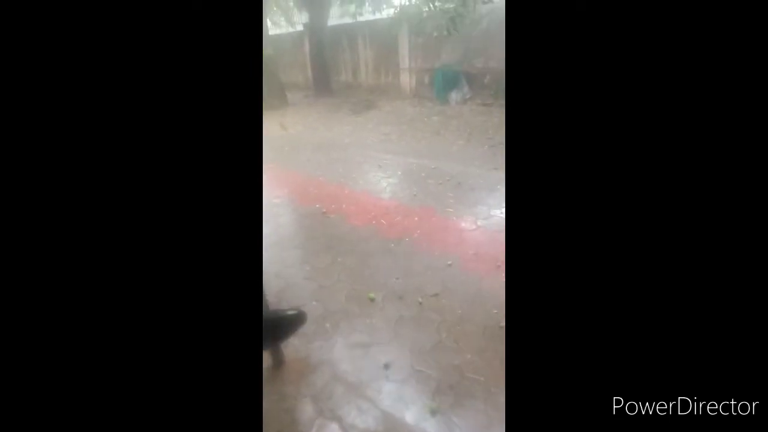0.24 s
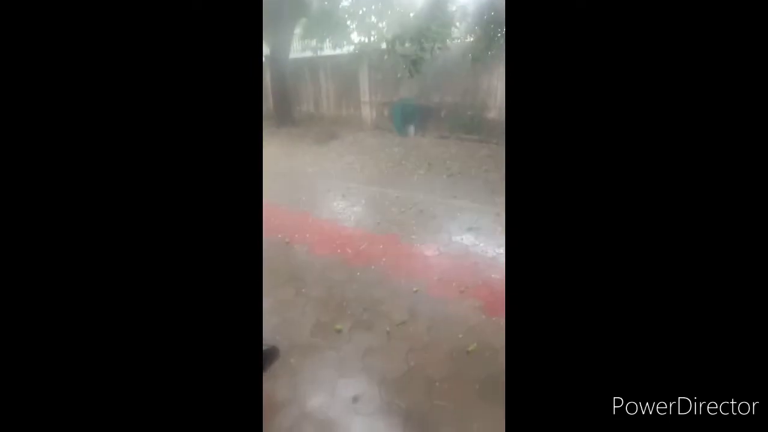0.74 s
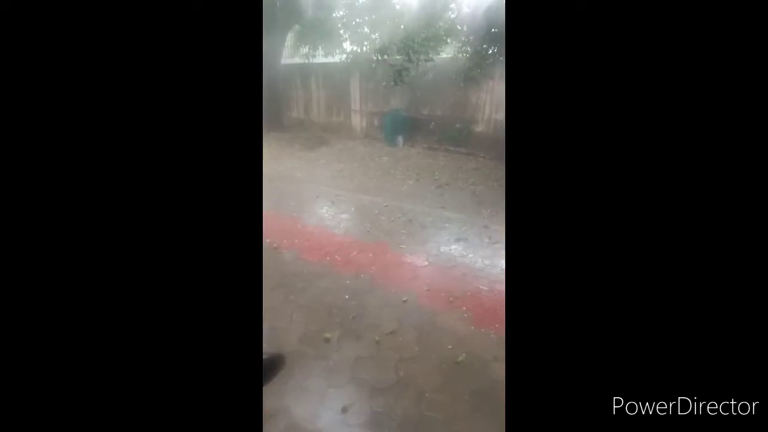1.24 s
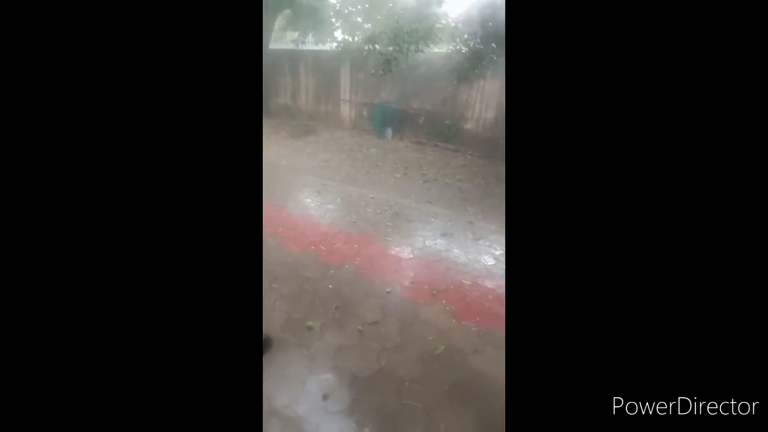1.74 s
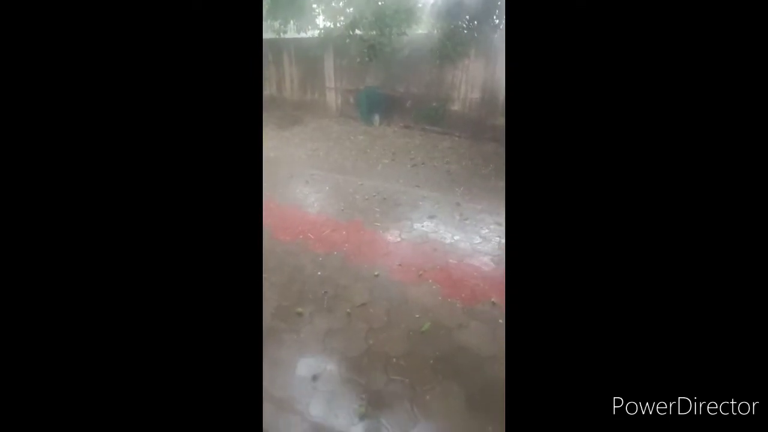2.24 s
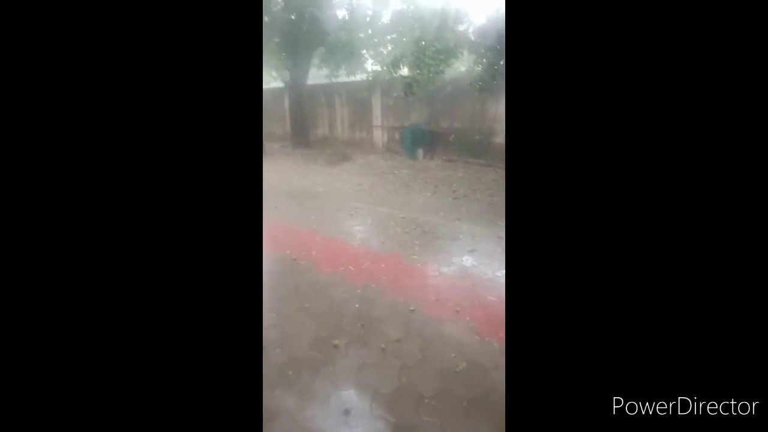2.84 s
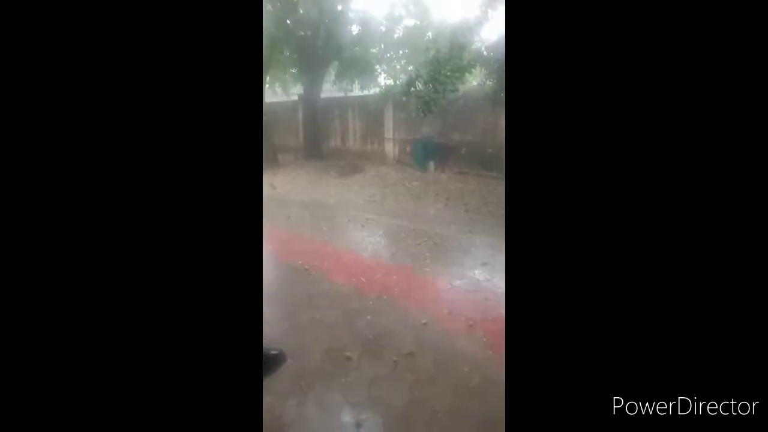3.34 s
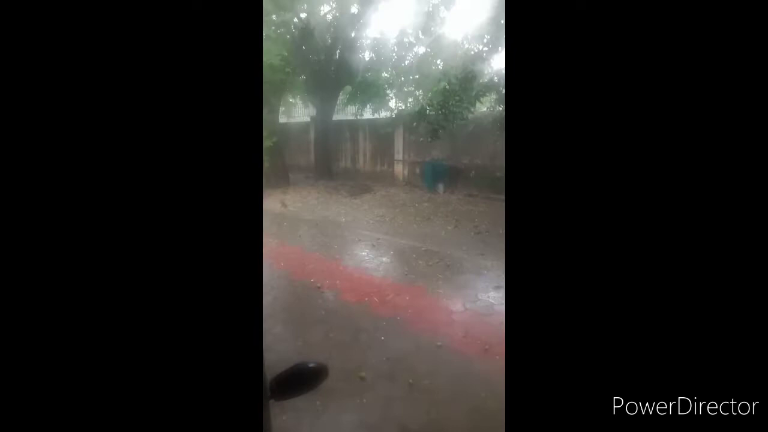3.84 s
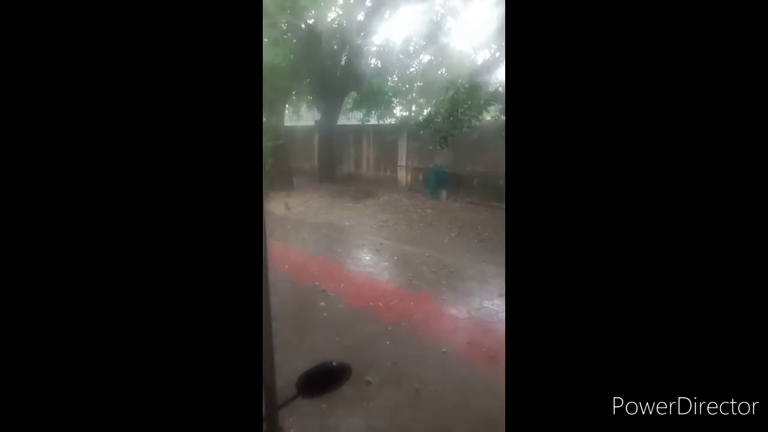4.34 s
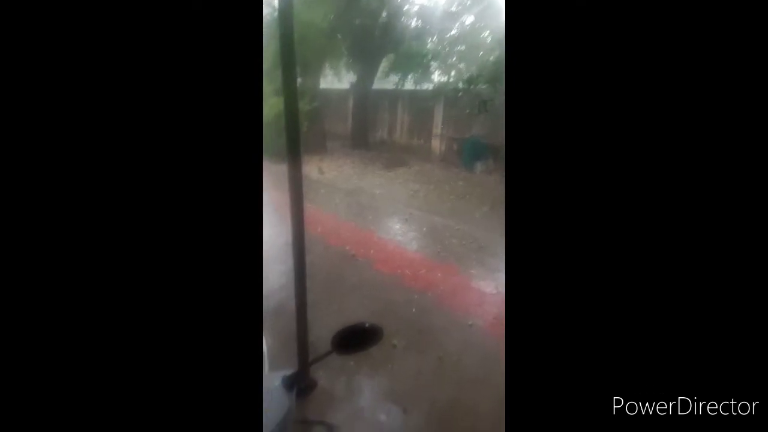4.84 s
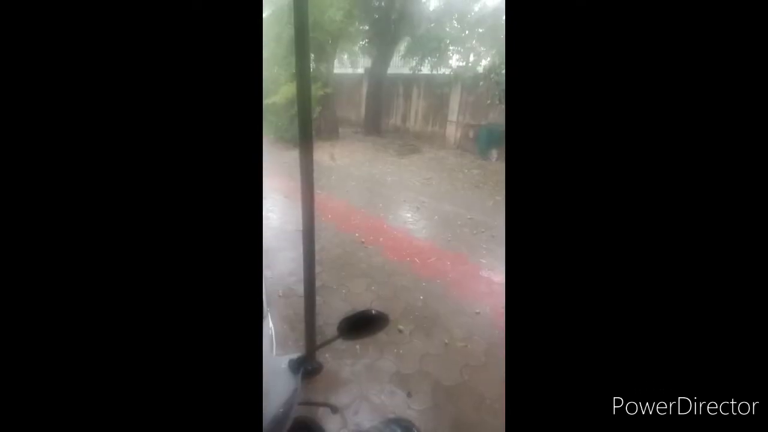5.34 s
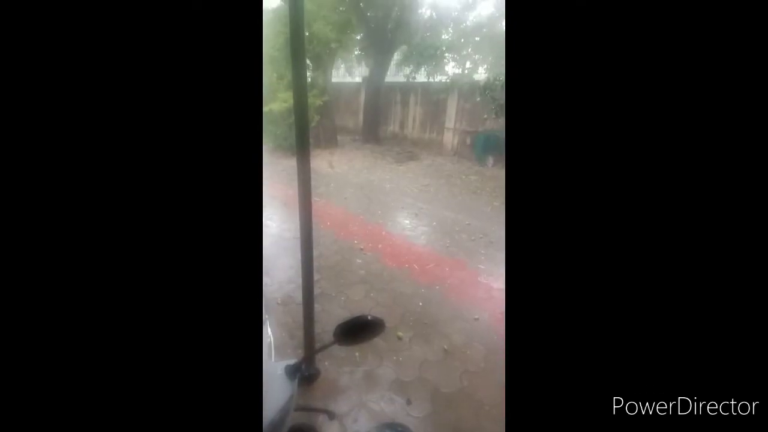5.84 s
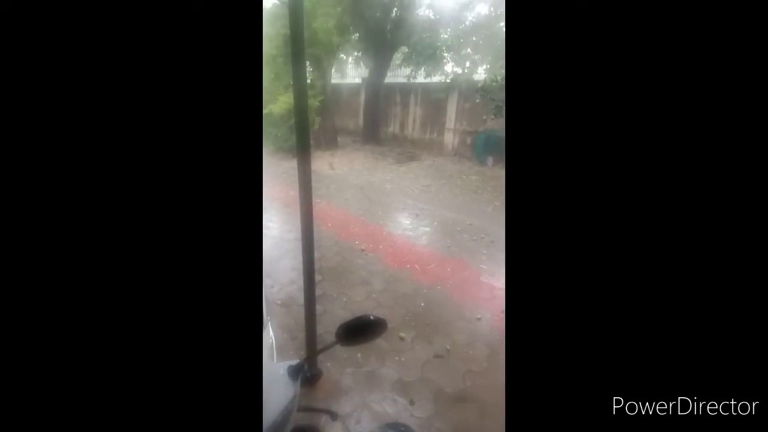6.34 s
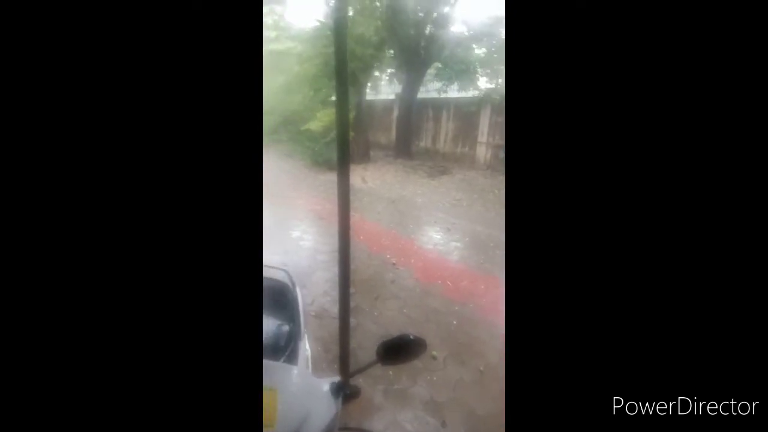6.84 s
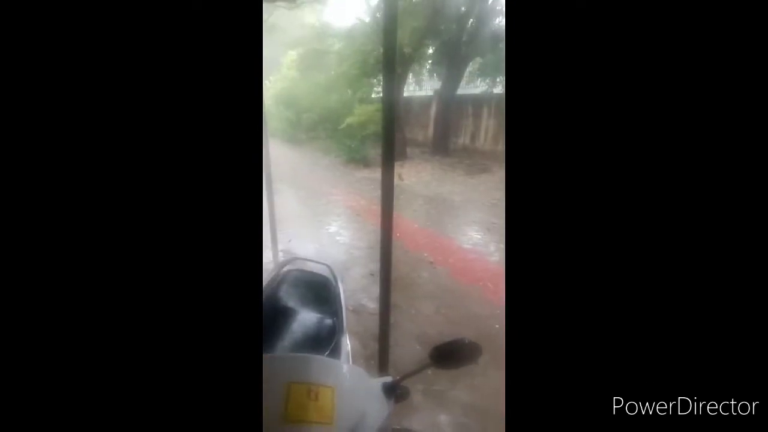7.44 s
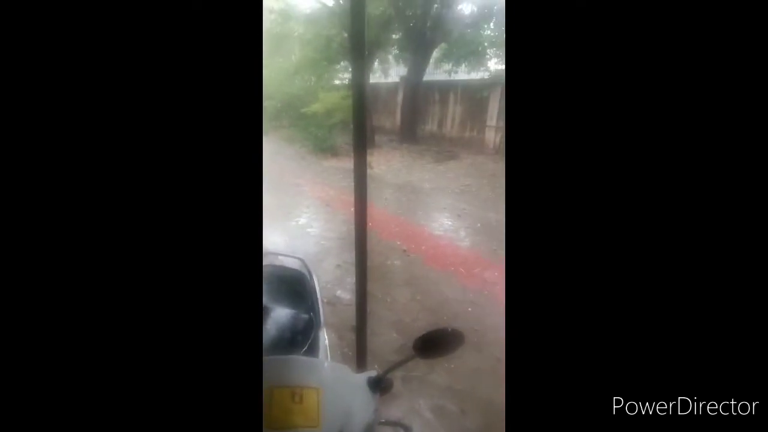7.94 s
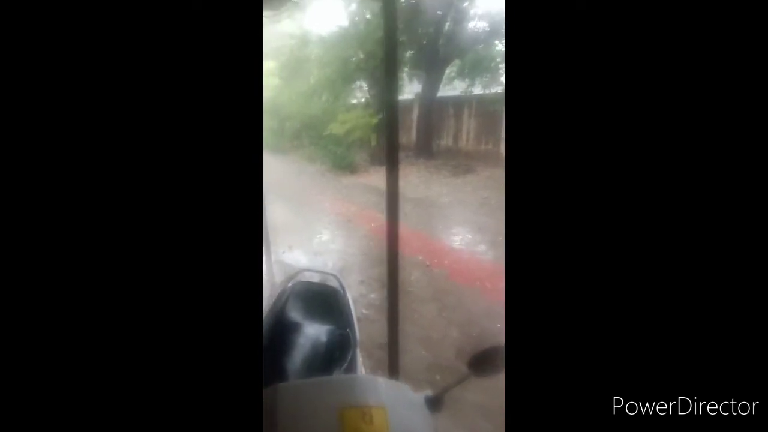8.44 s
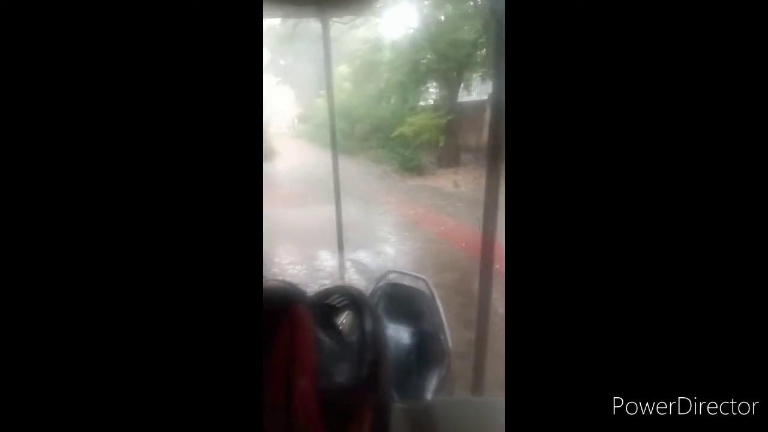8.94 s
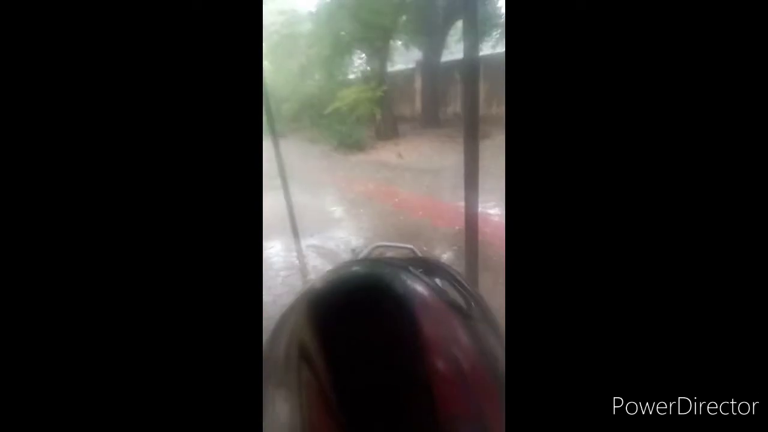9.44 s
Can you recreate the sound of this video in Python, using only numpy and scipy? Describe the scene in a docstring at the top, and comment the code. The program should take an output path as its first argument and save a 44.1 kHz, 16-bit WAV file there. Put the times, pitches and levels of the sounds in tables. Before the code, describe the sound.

A downpour with small hail beats on hard paving, heard from a sheltered edge through a small, dull microphone. The rain is continuous, granular and mid-heavy, dotted by woody knocks and occasional thin water spits. Low wind rumbles come and go early, ease near four seconds, then surge into hard flapping pressure blasts around six. Afterwards the rain seems quieter and creeps back under milder gusts.

```python
"""Heavy rain and hail pelt a paved courtyard, heard from a shelter at its edge, while wind rumbles and slaps.
Rain is a noise wash plus random impacts with decaying noise; close hail knocks and ticks, close drops spit.
Wind is noise whose level and upper corner rise with the airflow; fast air adds sharp pressure pulses.
The microphone rounds the hardest buffets, and its narrow port colours the treble.
The recorder's gain control sinks the rain under sustained loud wind, then lets it creep back."""
import sys
import numpy as np
from scipy import signal
from scipy.fft import rfft, irfft, next_fast_len
from scipy.io import wavfile
from scipy.ndimage import uniform_filter1d, minimum_filter1d

SR = 44100
rng = np.random.default_rng(int(sys.argv[2]) if len(sys.argv) > 2 else 0)


def bounce(signal):
    """Save signal as a 16-bit WAV file at the path given by the first command-line argument."""
    frames = np.transpose(np.atleast_2d(signal))
    limited = np.clip(frames, -1, 1)
    pcm = np.round(limited * 32767).astype(np.int16)
    wavfile.write(sys.argv[1], SR, pcm)


N = 428211
# transform length, padded so that filter tails do not wrap round, and its frequencies in Hz
SIZE = 2 * next_fast_len(N // 2 + 8192, real=True)
HZ = np.maximum(np.arange(SIZE // 2 + 1) * SR / SIZE, 1)


def from_db(db):
    """Logarithmic level: decibels to amplitude gain."""
    return 10 ** (np.asarray(db) / 20)


def rms_one(x):
    """Normalisation by mean power: scale to rms 1."""
    return x / np.sqrt(np.mean(x ** 2) + 1e-20)


def in_time(rows):
    """Linear interpolation: a curve's value at every sample."""
    seconds, value = np.transpose(rows)
    return np.interp(np.arange(N) / SR, seconds, value)


def drift(corner_hz):
    """Low-passed chance: noise at every 40th sample through two equal one-pole filters, scaled to rms 1."""
    pole = np.exp(-2 * np.pi * corner_hz * 40 / SR)
    noise = rng.standard_normal(N // 40 + 2002)
    slow = signal.lfilter([1], [1, -2 * pole, pole * pole], noise)[2000:]  # drop the settling
    return np.interp(np.arange(N) / 40, np.arange(len(slow)), rms_one(slow))


def butter(x, hz, kind, order=2):
    """Maximally flat (Butterworth) filtering."""
    return signal.sosfilt(signal.butter(order, hz, kind, fs=SR, output="sos"), x)


def resonance(x, hz, width_hz):
    """Damped resonance: a pole pair rings at one frequency, with a peak gain of about 1."""
    pole = np.exp(-np.pi * width_hz / SR)
    zeros = np.array([1, 0, -1]) * (1 - pole * pole) / 2
    poles = [1, -2 * pole * np.cos(2 * np.pi * hz / SR), pole * pole]
    return signal.lfilter(zeros, poles, x)


def colour(x, gain):
    """Minimum phase: the folded cepstrum gives a causal filter with the given gain at each of HZ."""
    cepstrum = irfft(np.log(gain))[:SIZE // 2]
    cepstrum[1:] *= 2
    return irfft(rfft(x, SIZE) * np.exp(rfft(cepstrum, SIZE)))[:N]


def impacts(per_s, spread_db, largest):
    """Poisson-like arrivals: blows at random times, their dB offset exponential and capped at largest."""
    blows, size = np.zeros(N), rng.exponential(1, N)
    hit = rng.random(N) < per_s / SR
    blows[hit] = from_db(spread_db * np.minimum(size[hit], largest))  # negative spread: rare blows are weak
    return blows


def splatter(blows, t60):
    """Exponential decay: each blow starts noise whose power falls 60 dB in t60 seconds."""
    decay = from_db(-120 / (t60 * SR))  # per sample, of power
    power = signal.lfilter([1], [1, -decay], blows ** 2 + 1e-18)
    return np.sqrt(power) * rng.standard_normal(N)


# The downpour's swell. Each row: time in seconds, level in dB before the layer gains.
DOWNPOUR = [(0, -22), (.9, -23), (1.75, -27), (2.25, -23), (2.95, -23.5), (3.25, -24), (3.45, -21),
            (3.9, -22), (4.15, -22.5), (4.9, -23), (5.5, -20.5), (6.2, -22.5), (7.0, -28.5), (7.9, -23.5),
            (8.6, -26), (9.7, -27)]
# Colour of water striking the paving. Each row: frequency in Hz, relative level per hertz in dB.
PAVING_COLOUR = [(40, -19), (120, -10), (300, -1.5), (600, -3), (850, -2), (1050, -0.5), (1250, -2),
                 (1600, 1.5), (2000, 0.9), (2500, 2), (3500, -1.5), (16000, 2)]
# Registers of the fine spray. Each row: lowest frequency in Hz, highest frequency in Hz.
SPRAY_REGISTERS = [(3600, 5100), (5500, 11500), (9000, 21000)]
SHEETS_DB, SHEETS_HZ = 1.27, 6.1  # the rain comes in uneven sheets: rms depth, corner of the drift


def rain(wash_db, drops_db, spray_db, pellets_db, pellet_tail_db):
    """Superposition of many impacts: far wash, near drops, fine spray and small hail share one swell."""
    wash = rng.standard_normal(N)
    drops = rms_one(impacts(per_s=1300, spread_db=-1.5, largest=6.3) * rng.choice([-1, 1], N))
    # droplets of three sizes, each with its own register
    spray = np.zeros(N)
    for band in SPRAY_REGISTERS:
        droplets = impacts(per_s=130, spread_db=4.0, largest=5.6)
        spray += butter(splatter(droplets, t60=0.013), band, "band")
    # walls and roof scatter each crack of small hail into a short tail
    stones = impacts(per_s=80, spread_db=6.0, largest=4.3)
    cracks = splatter(stones, t60=0.035)
    tails = from_db(pellet_tail_db) * splatter(stones, t60=0.19)
    pellets = rms_one(butter(cracks + tails, 1220, "high"))

    water = from_db(wash_db) * wash + from_db(drops_db) * drops
    water = water + from_db(spray_db) * rms_one(spray) + from_db(pellets_db) * pellets
    splash_hz, splash_db = np.transpose(PAVING_COLOUR)
    paving_db = np.interp(np.log(HZ), np.log(splash_hz), splash_db)
    downpour_db = in_time(DOWNPOUR) + SHEETS_DB * drift(SHEETS_HZ)
    return colour(water, from_db(paving_db)) * from_db(downpour_db)


# Steady push of the wind on the microphone. Each row: time in seconds, level in dB before buffets.
WIND_PUSH = [(0, -27), (.72, -18.5), (.88, -19.5), (1.35, -20.5), (1.64, -13.5), (1.74, -31), (2.15, -25),
             (2.4, -34.5), (2.8, -18.5), (3.15, -21.5), (3.3, -28.5), (3.8, -26), (4.15, -37),
             (4.58, -26.5), (4.7, -14), (5.3, -16), (5.48, -4), (6.05, -5), (6.55, -5.5), (6.8, -11.5),
             (7.0, -20), (7.45, -29), (7.8, -23.5), (8.2, -17.5), (8.55, -25.5), (8.66, -31), (9.1, -26.5),
             (9.7, -30.5)]
# Buffets that ride on the wind. Each row: start of the hold in seconds, its length in seconds, rise in dB.
WIND_BUFFETS = [(0.103, 0.017, 8.5), (0.245, 0.017, 12), (0.427, 0.02, 9), (0.53, 0.032, 5.5),
                (0.805, 0.24, 5.5), (1.13, 0.031, 5), (1.224, 0.061, 5), (1.446, 0.064, 6),
                (1.786, 0.034, 12.5), (2.631, 0.019, 9), (2.735, 0.037, 2), (4.67, 0.076, 3.5),
                (4.959, 0.061, 7.5), (5.118, 0.04, 10), (5.361, 0.025, 9.5), (5.427, 0.087, 5),
                (5.6, 0.19, 6.5), (5.857, 0.11, 9), (6.131, 0.067, 9), (6.257, 0.041, 4.5), (6.53, .11, 4),
                (7.862, 0.08, 8.5), (8.113, 0.033, 7.5), (8.2, 0.014, 8), (8.463, 0.13, 8.5)]
BUFFET_ATTACK_S, BUFFET_RELEASE_S = 0.027, 0.027
TURBULENCE_DB, TURBULENCE_HZ = 1.5, 9.8  # rms depth, corner of the drift


def airflow():
    """Turbulent flow: wind level in dB from a steady push, buffets that swell, hold and fade, and drift."""
    t = np.arange(N) / SR
    flow_db = in_time(WIND_PUSH) + TURBULENCE_DB * drift(TURBULENCE_HZ)
    for start, length, rise_db in WIND_BUFFETS:
        end = start + length
        corners = [start - BUFFET_ATTACK_S, start, end, end + BUFFET_RELEASE_S]
        flow_db += np.interp(t, corners, [0, rise_db, rise_db, 0])
    return flow_db


# rumble's upper corner in calm air, its rise at a wind level of 0 dB, and the power law between
CALM_HZ, EDDY_RISE_HZ, EDDY_GROWTH = 175, 500, 1.22
KNEE_FOLLOWS = 0.31  # octaves that the rumble's knee rises for each octave of its corner


def eddy_corner(flow_db):
    """Eddy scaling: faster air sheds smaller eddies, so the rumble's upper corner in Hz rises with the wind."""
    return CALM_HZ + EDDY_RISE_HZ * from_db(EDDY_GROWTH * flow_db)


def wind(flow_db, level_db, lumps_db, low_hz, calm_knee_hz, cascade, slope, brightening):
    """Turbulent cascade: eddies burst on the port, each burst louder and brighter than the flow around it."""
    burst, step = drift(40), 64  # spectrum updated every 64 samples
    corner = (eddy_corner(flow_db) * 2 ** (brightening * burst))[::step]
    # fast air also flattens the rumble, pushing its knee upward
    knee = calm_knee_hz * (corner / CALM_HZ) ** KNEE_FOLLOWS
    edges = 40 * 2 ** np.arange(0, 6.1, .5)  # half-octave bands
    white, out, power = rng.standard_normal((2, N)), 0, 0
    for k, (low, high) in enumerate(zip(edges, edges[1:])):
        hz = np.sqrt(low * high)
        # smaller eddies are weaker, and die out above the corner
        gain = 1 / np.sqrt((1 + (hz / knee) ** cascade) * (1 + (hz / corner) ** slope))
        # neighbouring bands use separate noises
        out = out + np.repeat(gain, step)[:N] * butter(white[k % 2], [low, high], "band")
        power = power + gain ** 2 * (high - low)
    even = out / np.repeat(np.sqrt(power), step)[:N]
    rumble = butter(even * from_db(lumps_db * burst), low_hz, "high", order=3)
    # the gust, not the single eddy, sets the mean strength over 4000 samples
    rumble = rumble / np.sqrt(uniform_filter1d(rumble ** 2, size=4000) + 1e-20)
    return rumble * from_db(level_db + flow_db)


# Single eddies that slap the port. Each row: time in seconds, relative pulse level in dB.
EDDY_SLAPS = [(5.383, 2), (5.459, 3), (5.555, 9), (6.101, 1), (6.276, 8), (6.583, 1), (6.633, -10)]


def slaps(flow_db, level_db, flutter_db, fast_hz, low_hz, high_hz):
    """Impulsive pressure: a few set pulses, and a ragged flutter that weakens steeply in slower air."""
    speed = np.minimum(eddy_corner(flow_db) / fast_hz, 1)
    flutter = impacts(per_s=56, spread_db=12.0, largest=1.4)
    pulses = flutter * speed ** 2 * from_db(flutter_db + flow_db)
    for s, peak_db in EDDY_SLAPS:
        pulses[round(s * SR)] = from_db(level_db + peak_db)
    rounded = butter(pulses * rng.choice([-1, 1], N), high_hz, "low", order=3)
    # make up for the height that the low-pass takes from a one-sample pulse
    return butter(rounded, low_hz, "high") * SR / (2 * high_hz)


# Close hailstones. Each row: time in seconds, relative knock level in dB, knock frequency in Hz,
# relative tick level in dB.
CLOSE_HAIL = [(0.3585, -6, 1610, -49), (0.5, 1, 1800, -34), (0.585, -3.5, 2280, -43),
              (0.7412, -6.5, 1850, -47), (1.6134, -4, 2060, -38), (2.0395, -3, 1740, -31.5),
              (2.2387, -1.5, 2300, -41), (2.3009, -1.5, 1700, -32.5), (2.5489, -4, 1890, -38),
              (2.814, -2.5, 1900, -33.5), (2.882, -3, 2090, -47), (2.9407, 0.5, 1500, -42),
              (3.258, 8, 1470, -34), (3.3602, 0.5, 2190, -47), (3.7505, -3, 1680, -32),
              (3.9498, 5, 2250, -39), (5.291, 2.5, 1890, -40), (6.197, 7, 1120, -49),
              (6.6524, -1.5, 1420, -39), (7.5268, 2.5, 2670, -32), (8.042, 5, 1520, -43),
              (8.3506, 0, 1980, -30), (8.526, -6.5, 2250, -42), (8.6055, -1.5, 2050, -36),
              (9.379, 0.5, 2530, -38), (9.6953, 6, 2240, -24)]


def hail(knock_db, tick_db, knock_width_hz, crack_t60, tick_t60, tail_db, tail_t60):
    """Impact excitation: a dull resonant knock, a higher tick of shattering ice, and a tail from the walls."""
    out, t = np.zeros(N + SR), np.arange(SR // 5) / SR
    tail = from_db(tail_db - 60 * t / tail_t60)
    knock_fade = from_db(-60 * t / crack_t60) + tail
    tick_fade = from_db(-60 * t / tick_t60) + tail / 2
    for s, peak_db, hz, treble_db in CLOSE_HAIL:
        crack = rng.standard_normal(len(t))
        knock = resonance(crack * knock_fade, hz, knock_width_hz)
        knock = butter(knock, [1050, 3200], "band", order=3)
        tick = butter(crack * tick_fade, [3700, 10000], "band")
        # both parts are scaled by their energy over the length of the crack
        knock = knock / np.sqrt(np.sum(knock ** 2) / (crack_t60 * SR))
        tick = tick / np.sqrt(np.sum(tick ** 2) / (crack_t60 * SR))
        start = round(s * SR)
        out[start:start + len(t)] += from_db(knock_db + peak_db) * knock + from_db(tick_db + treble_db) * tick
    return out[:N]


# Drops that splash right beside the microphone. Each row: time in seconds, relative level in dB.
CLOSE_DROPS = [(0.9253, -9), (3.587, -21), (4.2262, -6.5), (4.8578, -12), (4.9126, -7), (8.173, -4.5),
               (8.253, -8), (9.323, -10.5)]


def drips(level_db, t60, low_hz):
    """Transient noise: a drop bursting close by is a short, thin spit of high-passed spray."""
    blows = np.zeros(N)
    for s, peak_db in CLOSE_DROPS:
        blows[round(s * SR)] = from_db(level_db + peak_db)
    return butter(splatter(blows, t60), low_hz, "high")


def overload(x, top_db):
    """Saturation: the hardest buffets drive the microphone to its limit, which rounds their peaks."""
    return from_db(top_db) * np.tanh(x / from_db(top_db))


# Resonances of the microphone port above its main band. Each row: centre frequency in Hz,
# half-power width in Hz, gain in dB.
PORT_RESONANCES = [(4090, 426, -20.5), (5054, 530, -20), (6178, 500, -12.5), (6986, 510, -19.5),
                   (8220, 500, -30.5), (9170, 600, -30.5), (10370, 520, -37), (11480, 710, -29),
                   (12500, 600, -35), (13530, 520, -23), (14500, 650, -28.5), (15300, 450, -39)]


def microphone(x, band_hz, steepness, leak_db):
    """Port resonance: a main band passes and, above it, narrow resonances over a faint leak."""
    main_band = 1 / (1 + (HZ / band_hz) ** steepness) / (1 + (HZ / 3230) ** 33.6)
    power = main_band + from_db(leak_db) ** 2
    for hz, width_hz, db in PORT_RESONANCES:
        power = power + from_db(db) ** 2 * .5 ** ((2 * (HZ - hz) / width_hz) ** 2)
    return colour(x, np.sqrt(power))


def released(cut_db, db_per_s):
    """Linear release: a gain cut is let go at a steady rate in dB."""
    fall = db_per_s * np.arange(N) / SR
    return np.maximum.accumulate(cut_db + fall) - fall


def gain_control(x, threshold_db, window_s, hold_s, release_db_per_s):
    """Level compression: sustained loudness turns the gain down; it waits, then creeps back."""
    window, hold = int(window_s * SR), int(hold_s * SR) | 1
    loudness_db = 10 * np.log10(uniform_filter1d(x ** 2, size=window) + 1e-12)
    over_db = np.maximum(loudness_db - threshold_db, 0)
    held_db = -minimum_filter1d(-over_db, size=hold, origin=hold // 2)
    return x * from_db(-released(held_db, release_db_per_s))


def limiter(x, ceiling, ahead_s, release_db_per_s):
    """Look-ahead limiting: the gain ducks just ahead of any peak over the ceiling and recovers quickly."""
    size = int(2 * ahead_s * SR) | 1
    over_db = 20 * np.log10(np.maximum(np.abs(x) / ceiling, 1))
    cut_db = released(-minimum_filter1d(-over_db, size=size), release_db_per_s)
    return x * from_db(-uniform_filter1d(cut_db, size=size))


def scene():
    """Superposition: rain, wind, hail and drips add at one microphone."""
    water = rain(wash_db=8.5, drops_db=8.5, spray_db=-1.0, pellets_db=5.0, pellet_tail_db=-7.5)
    flow_db = airflow()
    gusts = wind(flow_db, level_db=0.0, lumps_db=2.0, low_hz=87, calm_knee_hz=147,
                 cascade=2.8, slope=4.66, brightening=0.46)
    buffets = slaps(flow_db, level_db=1.0, flutter_db=-1.5, fast_hz=910, low_hz=98, high_hz=790)
    stones = hail(knock_db=-17.0, tick_db=18.5, knock_width_hz=1100, crack_t60=0.027,
                  tick_t60=0.028, tail_db=-3.5, tail_t60=0.12)
    spits = drips(level_db=10.5, t60=0.025, low_hz=5000)
    return (water + gusts + buffets + stones + spits)[None]


def record(dry):
    """Signal chain: microphone overload and colour, gain control, peak limiting, and a steep top cut."""
    x = overload(dry[0], top_db=14.0)
    x = microphone(x, band_hz=2870, steepness=14.0, leak_db=-38.5)
    x = gain_control(x, threshold_db=-12.0, window_s=0.26, hold_s=0.24, release_db_per_s=6.0)
    x = limiter(x, ceiling=0.94, ahead_s=0.036, release_db_per_s=49)
    top_cut = signal.ellip(12, 0.1, 90, 15500, fs=SR, output="sos")  # low-pass at 15.5 kHz
    return signal.sosfilt(top_cut, x)[None]


dry = scene()
out = record(dry)
bounce(out)
```